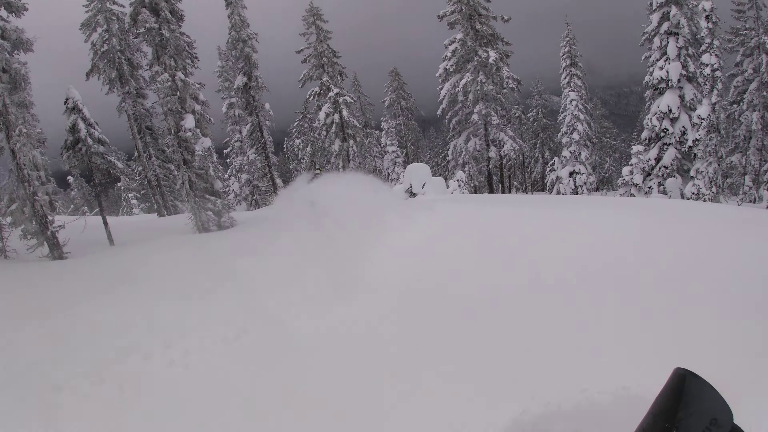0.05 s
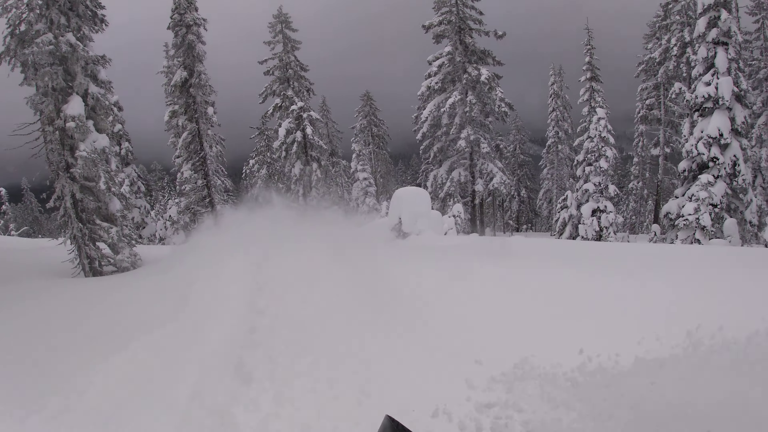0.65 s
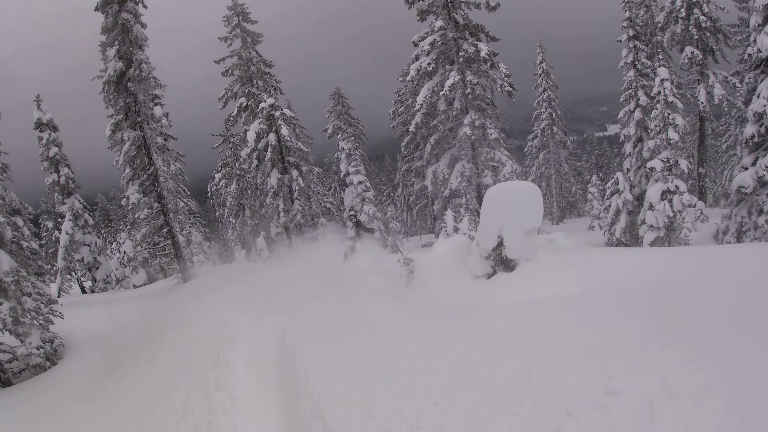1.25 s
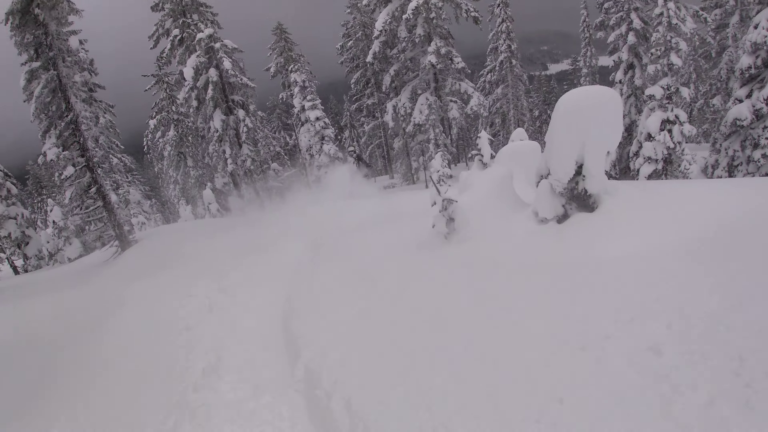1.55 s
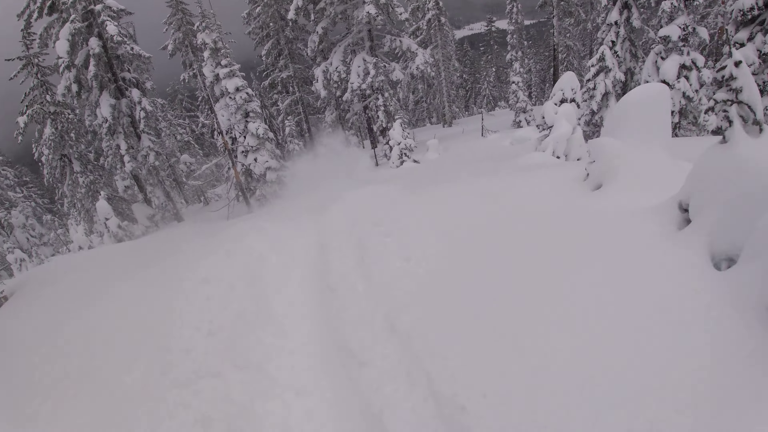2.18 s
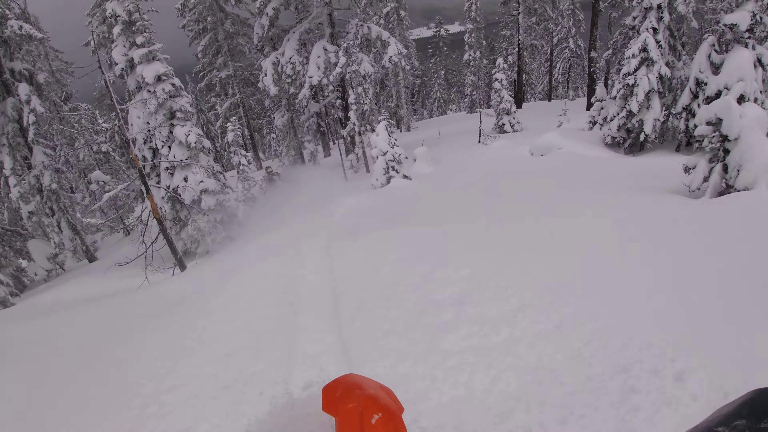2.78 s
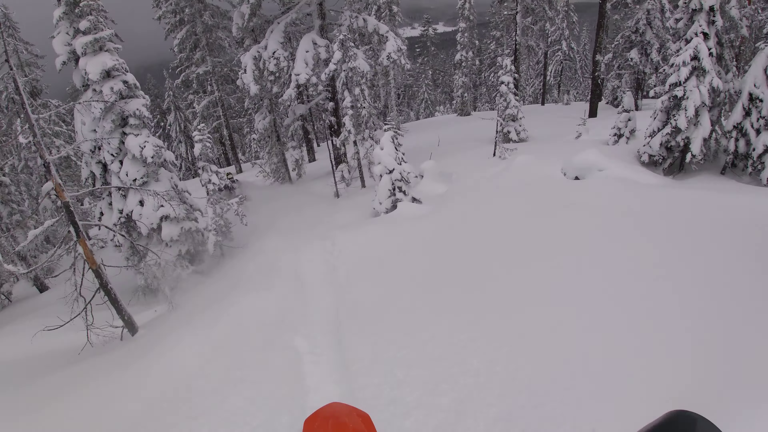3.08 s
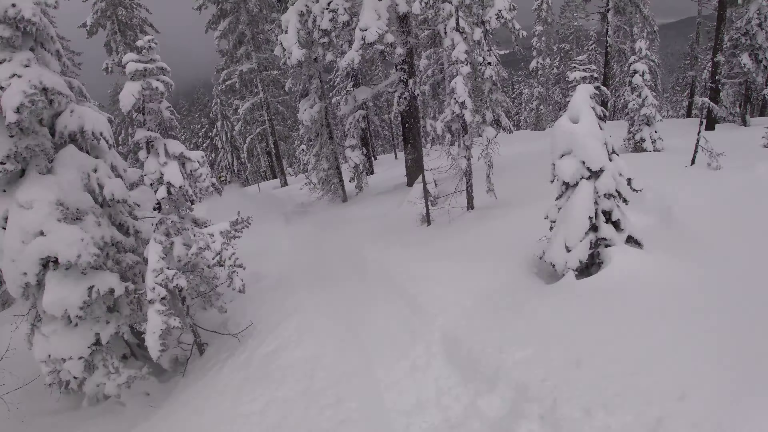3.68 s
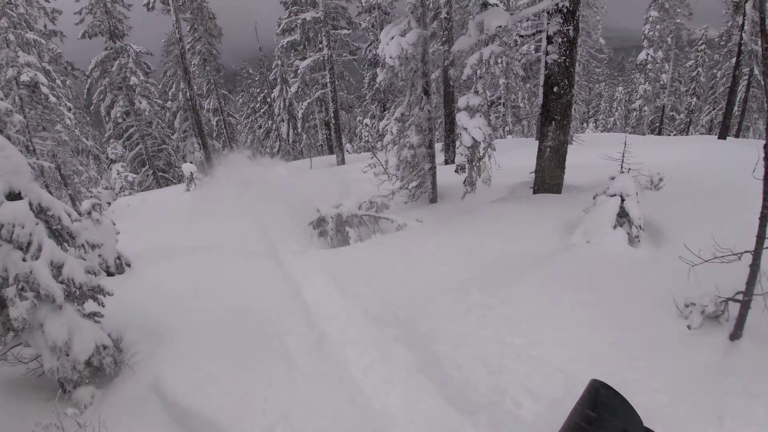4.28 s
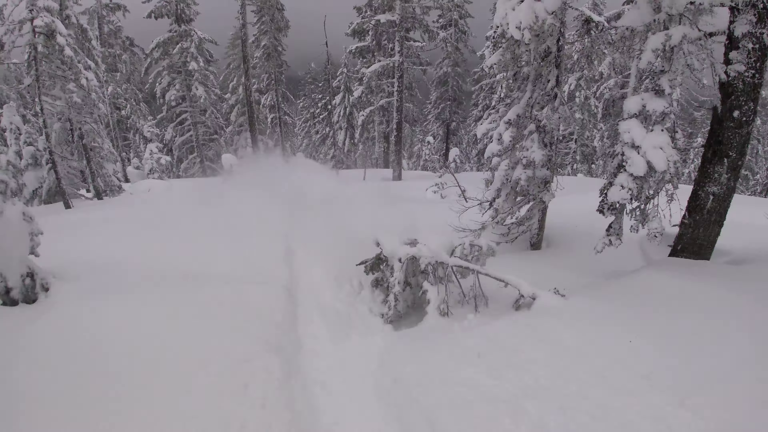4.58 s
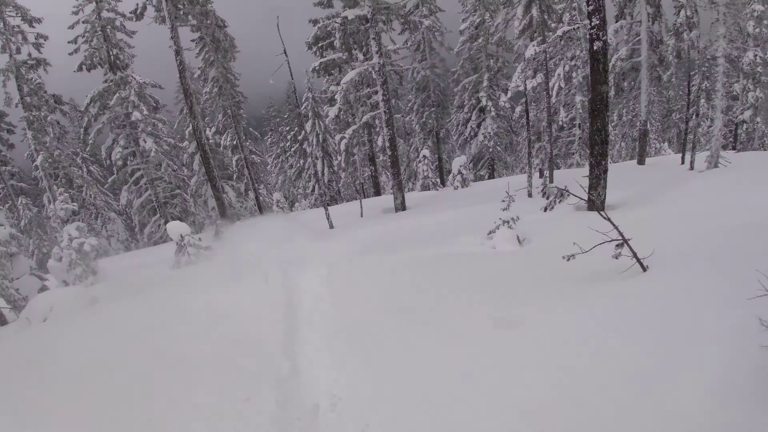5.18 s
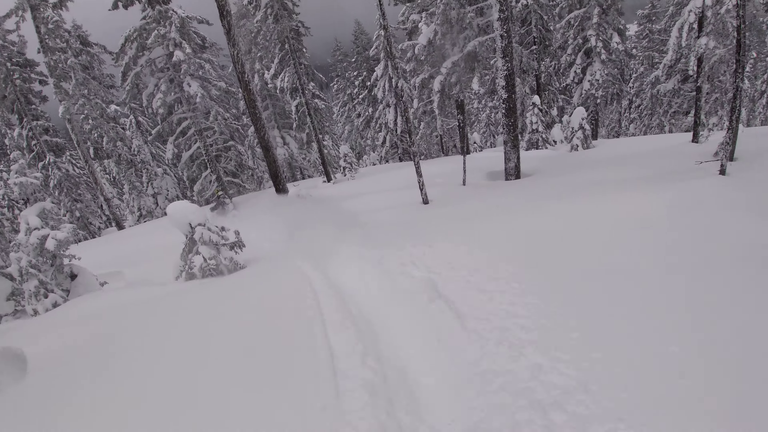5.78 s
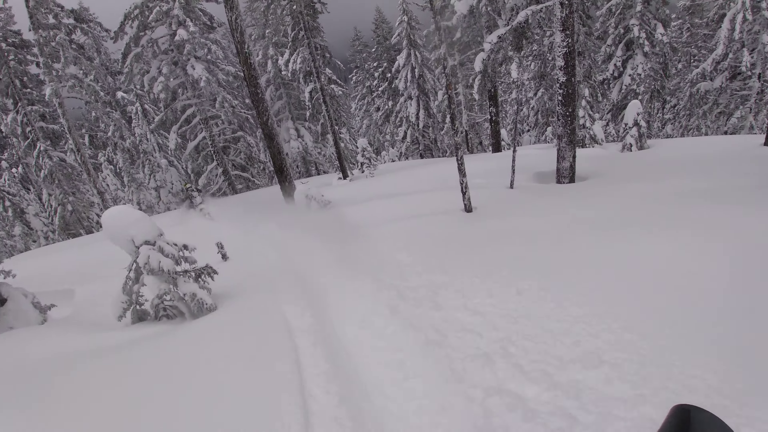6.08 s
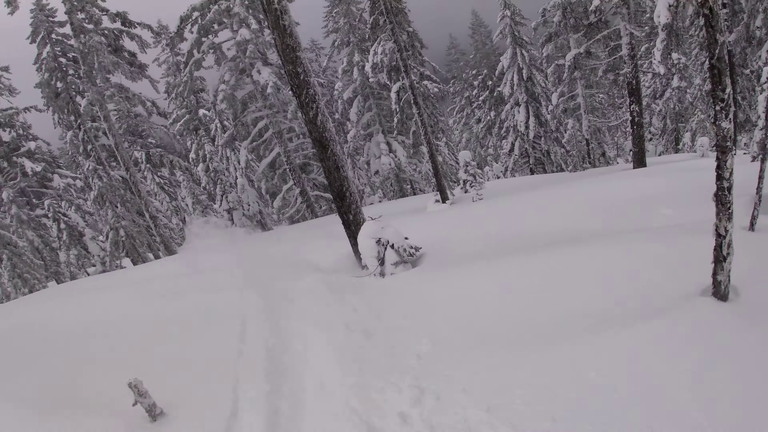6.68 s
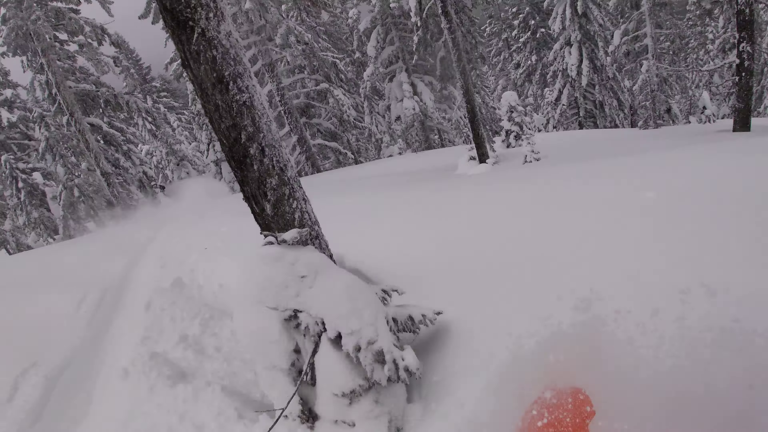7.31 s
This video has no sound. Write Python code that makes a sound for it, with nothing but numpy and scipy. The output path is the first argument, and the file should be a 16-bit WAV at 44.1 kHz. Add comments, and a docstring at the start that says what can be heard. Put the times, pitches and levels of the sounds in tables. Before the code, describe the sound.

A snowmobile engine runs for about seven and a half seconds, heard close from the rider's seat in deep snow: a dull, ringing, rapid thudding. It starts fast, slows towards 2 seconds, then rises and falls in short pushes of throttle between 3 and 5.5 seconds, with another at 6.3. A faster, sharp crackle, like a second machine revving, cuts in from 0.9 to 1.9 seconds, climbing in speed, again from 2.7 to 3, and from 5.4 to 6.3. It then drops to a soft putter while the main engine eases, leaving a stumbling rumble. A short, low hoot falls at about 1 second, and a thin squeal slips down at 4.8. Wind buffets the microphone throughout. Lower in level, the track churns snow, with faint spray hiss and soft swishes. The skis give brief crunches around 6.7 and 7.4 seconds.

```python
"""A dull, ringing thud from a snowmobile's muffler, one per firing, rises and falls with the throttle.
The microphone is at the rider's seat, out in deep powder, with wind buffeting it throughout.
Three times a faster, sharp crackle cuts in, like a second machine revving and then ticking over.
Just below, the track churns snow, spray hisses and the skis crunch; a hoot and a squeal slide by."""
import sys
import numpy as np
from scipy import signal
from scipy.fft import rfft, irfft
from scipy.io import wavfile
from scipy.ndimage import uniform_filter1d, minimum_filter1d

SR = 44100
rng = np.random.default_rng(int(sys.argv[2]) if len(sys.argv) > 2 else 0)


def transcribe(signal):
    """Save signal, clipped to [-1, 1], as a 16-bit WAV file at the path in sys.argv[1]."""
    frames = np.atleast_2d(signal).T
    limited = np.clip(frames, -1, 1)
    pcm = np.round(limited * 32767).astype(np.int16)
    wavfile.write(sys.argv[1], SR, pcm)


N = 328545
TIME = np.arange(N) / SR

# engine speed: t/s, firing rate/Hz
ENGINE_SPEED = [(0.0, 38.97), (0.27, 37.72), (0.52, 39.18), (0.7, 38.2), (1.24, 30.23), (1.42, 26.55),
                (1.58, 28.62), (1.8, 28.0), (1.98, 23.83), (2.08, 26.19), (2.65, 27.3), (2.93, 30.75),
                (3.11, 27.43), (3.39, 31.44), (3.53, 35.47), (4.13, 27.98), (4.25, 33.92), (4.45, 30.89),
                (4.65, 38.52), (4.75, 34.74), (5.19, 34.09), (5.33, 36.25), (5.41, 31.08), (6.15, 25.63),
                (6.29, 30.84), (6.63, 29.03), (6.83, 26.01), (7.45, 25.78)]
# throttle, as the strength of the muffler's ring: t/s, level/dB
THROTTLE = [(0, -18), (.81, -18.5), (1.43, -24), (1.55, -22.5), (1.82, -19.5), (1.95, -26.5), (2.04, -19.5),
            (2.62, -20), (2.86, -18.5), (3.14, -20.5), (3.28, -16), (3.39, -24), (3.49, -17), (3.63, -19),
            (3.74, -26.5), (4.05, -22), (4.28, -15), (4.4, -21), (4.66, -15.5), (4.74, -22.5), (4.86, -13),
            (5.18, -20.5), (5.35, -15.5), (5.47, -22), (6.2, -26), (6.32, -13), (6.43, -22.5),
            (6.67, -21.5), (6.77, -34.5), (7.17, -27), (7.45, -36.5)]
# the muffler's ring at cruise, its bark and the bark's top overtone: f/Hz, width/Hz, gain/dB
MUFFLER_MODES = [(259.3, 87, 0.28), (399.7, 110, -2.5), (1100, 890, -38.5)]
# the muffler's balance at cruising throttle: t/s, boom/dB, body/dB, bark/dB
MUFFLER_TONE = [(0, -15.5, -17, -24), (.9, -17, -16.5, -21.5), (1.3, -19, -19.5, -30),
                (1.65, -13, -18, -29.5), (1.92, -16.5, -17.5, -36), (2.07, -21, -18.5, -24.5),
                (2.24, -15, -18.5, -23.5), (2.55, -17, -18.5, -41), (2.8, -15, -19.5, -31),
                (2.87, -15, -18.5, -18.5), (3.05, -20.5, -22, -16), (3.15, -17.5, -21, -27),
                (3.3, -20.5, -20, -24), (3.55, -21.5, -18.5, -23.5), (3.95, -15, -20, -47.5),
                (4.35, -28, -17, -30.5), (4.65, -20.5, -16, -34), (4.9, -16.5, -25, -36.5),
                (5.18, -26, -16, -30), (5.45, -25, -18.5, -35.5), (6.2, -14, -21, -46.5),
                (6.65, -23.5, -17, -41), (7.45, -17.5, -17, -38.5)]
# centre of its deep boom: t/s, f/Hz
BOOM_PITCH = [(0, 69.4), (.9, 65.4), (1.6, 55.3), (2.5, 54.9), (3.3, 59.8), (4.1, 59.6), (5.0, 66),
              (5.7, 66), (6.3, 70.4), (6.9, 62), (7.45, 61.5)]
# the bark's nasal first overtone: t/s, f/Hz, level against the bark/dB
NASAL_OVERTONE = [(0, 742, -17.5), (1.0, 730, -17.5), (2.1, 825, -16), (2.5, 836, -22), (2.85, 650, -19.5),
                  (3.3, 660, -25.5), (4.2, 700, -19.5), (4.9, 720, -12)]
# spectrum of turbulent exhaust gas: f/Hz, level/dB
GAS_COLOUR = [(50, -10), (100, -12), (270, 4.5), (400, -4.5), (550, -16.5), (900, -39)]
# snap at the front of each thud: t/s, level/dB
SNAP_LEVEL = [(0, -50.5), (.8, -50), (1.2, -63), (1.95, -53), (2.1, -41), (2.25, -43.5), (2.5, -72),
              (2.85, -34), (3.04, -38), (3.12, -58), (3.25, -39.5), (3.8, -66.5), (4.27, -50), (4.4, -64),
              (4.7, -47), (4.8, -60), (4.9, -39), (5.04, -41.5), (5.2, -57), (5.33, -40), (5.5, -62),
              (7.45, -67)]
# its resonances: f/Hz, width/Hz, gain/dB
SNAP_MODES = [(893, 330, -5.5), (1250, 310, -12), (2100, 1500, -26)]
# spectrum of the intake's rasp: f/Hz, level/dB
INTAKE_COLOUR = [(900, -9), (1400, -6.5), (2100, 8), (2900, -1.5), (3700, -0.5), (4500, -6.5), (5600, -13),
                 (6500, -17.5), (7500, -30.5), (11000, -49.5)]

# the second machine's speed in each of its three bursts: t/s, stroke rate/Hz
BURST_SPEED_A = [(0.8523, 38.52), (1.03, 38.51), (1.2, 42.9), (1.4, 38.8), (1.5, 44.52), (1.62, 53.48),
                 (1.786, 61.0), (1.87, 60.0)]
BURST_SPEED_B = [(2.6525, 42.2), (2.75, 46.8), (2.8, 48.0), (2.85, 50.8), (3.036, 50.4)]
BURST_SPEED_C = [(5.3944, 49.35), (5.55, 49.12), (5.7, 47.73), (5.85, 50.97), (6.0, 49.19), (6.15, 48.08),
                 (6.258, 49.56), (6.36, 47.0)]
# its pipe, one curve per burst: t/s, ring f/Hz, thump/dB, ring/dB, middle/dB, high/dB
PIPE_CURVES = [
    [(.85, 1500, -59, -72, -62, -57), (.93, 1490, -56, -56, -45, -53.5),
     (1.06, 1480, -48.5, -50, -32, -45.5), (1.11, 1460, -55.5, -42, -39, -52),
     (1.135, 1440, -57, -42, -27.5, -54.5), (1.19, 1440, -53, -40.5, -25.5, -47),
     (1.26, 1460, -43, -37.5, -24, -47), (1.36, 1410, -56, -34.5, -33, -55),
     (1.43, 1370, -37.5, -37.5, -27.5, -44.5), (1.56, 1400, -30.5, -33, -27, -51),
     (1.68, 1280, -34.5, -29.5, -29, -43.5), (1.77, 1260, -35, -31, -29.5, -52.5),
     (1.87, 1240, -50, -56, -52, -65)],
    [(2.65, 1390, -43, -43, -45, -65), (2.72, 1300, -34.5, -36, -48, -62),
     (2.76, 1300, -36.5, -41, -48, -61), (2.82, 1290, -29.5, -34, -44, -49),
     (2.88, 1230, -47, -42.5, -50, -55), (3.03, 1210, -48, -41, -57, -53)],
    [(5.4, 1400, -38, -48, -76, -70), (5.58, 1470, -32, -37, -59, -64), (5.7, 1430, -33.5, -40, -45, -56),
     (5.79, 1450, -38.5, -32.5, -41.5, -40.5), (5.92, 1350, -34.5, -35, -42.5, -47),
     (5.99, 1340, -39, -36, -35.5, -54), (6.16, 1320, -34, -36.5, -44, -41),
     (6.23, 1190, -35.5, -36.5, -39, -52.5), (6.28, 1200, -42.5, -50.5, -45, -58),
     (6.35, 1200, -55, -59, -61.5, -58)],
]
# one row per burst: echo off the snow/dB, low knock/dB, top sizzle/dB
BURST_TRIMS = [(-21, 1, -3), (-21.5, -0.5, 1), (-12.5, -2, 2.5)]
# the pipe's two thumps: f/Hz, width/Hz, gain/dB
THUMP_MODES = [(405, 220, -3), (538, 260, -3)]
# resonances of its cracks, two low, one middle, two high: f/Hz, width/Hz, gain/dB
CRACK_MODES = [(760, 530, -7), (1460, 810, -4.5), (2274, 1050, -8.5), (3400, 1640, 2), (5320, 1200, -6)]
# the second machine ticking over: t/s, stroke rate/Hz
IDLE_SPEED = [(6.0, 46), (6.36, 49.5), (6.8, 48), (7.45, 48.5)]
# strength of that putter: t/s, level/dB
PUTTER_LEVEL = [(6.0, -35), (6.22, -28), (6.45, -31), (6.7, -28), (7.0, -29.5), (7.45, -24.5)]
# its resonances: f/Hz, width/Hz, gain/dB
PUTTER_MODES = [(54.7, 53, -1.5), (104, 44, -2), (150, 70, -6.5)]

# a low hoot, falling while the engine slows: t/s, f/Hz, level/dB
HOOT_GLIDE = [(.88, 468, -47.5), (.95, 434, -27), (1.0, 430, -23.5), (1.05, 388, -23.5), (1.1, 362, -16),
              (1.18, 330, -49)]
# a brief, thin squeal, perhaps the drive belt: t/s, f/Hz, level/dB
SQUEAL_GLIDE = [(4.745, 960, -74), (4.768, 923, -33), (4.79, 840, -46), (4.81, 844, -35),
                (4.835, 796, -40.5), (4.86, 800, -72)]

# drag of the snow on the track, as the strength of its churning: t/s, relative level/dB
SNOW_DRAG = [(0, -49.5), (.8, -40), (1.15, -46), (1.65, -39.5), (1.95, -47), (2.4, -43.5), (2.75, -40.5),
             (3.2, -48.5), (3.55, -39), (4.0, -50), (4.38, -43), (4.48, -36.5), (4.62, -44.5),
             (4.75, -42.5), (5.0, -46.5), (5.5, -40.5), (6.2, -41.5), (6.9, -51), (7.45, -51.5)]
# spectra of churned snow and of spray: f/Hz, level/dB
CHURN_COLOUR = [(250, -7.5), (420, 13.5), (600, 8.5), (900, -1.5), (1400, -7.5), (2000, -17.5),
                (3000, -32.5), (5000, -50.5)]
SPRAY_COLOUR = [(900, -21), (1400, 2.5), (1700, 3), (2000, 5), (2400, -0.5), (2900, -1), (3400, 2.5),
                (3900, -6.5), (4400, -8.5), (5400, -2.5), (6200, -17), (7200, -30.5), (9000, -29.5),
                (12000, -56.5)]
# skis shoving into packed snow: t/s, length/s, relative level/dB
SKI_SHOVES = [(6.648, 0.028, -26), (6.681, 0.019, -28.5), (6.753, 0.036, -30.5), (7.359, 0.036, -33.5),
              (7.419, 0.054, -32.5)]
# spectrum of a shove: f/Hz, level/dB
CRUNCH_COLOUR = [(200, 9), (450, 11), (1000, 0), (1700, -10.5), (2600, -23.5), (5000, -44)]
# snow brushing past the seat: t/s, half-length/s, f/Hz, half-width/octaves, level/dB
SNOW_BRUSHES = [(0.272, 0.3, 3270, 0.52, -57.5), (1.791, 0.11, 2020, 0.88, -42),
                (1.93, .09, 12000, .6, -72), (2.851, 0.039, 1030, 2, -40.5),
                (3.643, 0.21, 1365, 1.4, -47.5), (3.744, 0.064, 2700, 0.66, -54),
                (4.475, 0.054, 1000, 1.7, -43), (4.477, 0.034, 3960, 1.1, -59.5),
                (4.479, 0.041, 8600, .6, -78), (4.547, .05, 1480, 1.1, -50),
                (4.527, 0.062, 3000, .4, -50.5), (4.683, 0.028, 900, 1.4, -41),
                (5.24, .06, 8600, .6, -73.5), (6.532, 0.12, 3300, 0.83, -53.5)]
# crumbs of snow hitting the microphone: t/s, relative level/dB
CRUMB_HITS = [(2.5805, -52), (3.5279, -61), (4.4408, -55), (4.781, -55), (4.9776, -55), (5.2494, -56),
              (6.7106, -57), (7.145, -57)]
# spectrum of a crumb's tick: f/Hz, level/dB
TICK_COLOUR = [(4000, -7), (8500, 4), (11000, -9), (14000, -19)]
# wind on the microphone: t/s, level/dB
WIND_LEVEL = [(0, -18), (1.2, -24), (1.6, -24), (2.5, -25.5), (3.4, -19.5), (4.3, -22), (5.2, -22.5),
              (5.8, -21.5), (6.6, -21.5), (7.45, -24)]
# its spectrum: f/Hz, level/dB
WIND_COLOUR = [(15, -7), (27, -1.5), (50, -1), (100, -8.5), (200, -7.5), (400, -28)]

CRUISE_DB, CRUISE_PER_S, USUAL_DRAG_DB = -18.5, 25.8, -44.5   # reference throttle, firing rate and drag


def engine():
    """Close to the seat, each firing rings the muffler; a steady rush of gas grows as the snow drags."""
    times, _ = firings(ENGINE_SPEED)
    per_s, = read(ENGINE_SPEED, times)
    boom, body, ring, bark, body_hz = muffler(times)
    boom_hz, = read(BOOM_PITCH, times)
    nasal_hz, nasal_db = read(NASAL_OVERTONE, times)
    (ring_hz, ring_width_hz, ring_db), *barks = MUFFLER_MODES
    revs = per_s / CRUISE_PER_S
    modes = [(boom_hz, 39, -5), (body_hz, 125.6, 0),   # f/Hz, width/Hz, gain/dB
             (ring_hz * revs ** .16, ring_width_hz * revs[:, None] ** .75, ring_db),
             (172, 60, -10.5),   # hollow lower ring
             (nasal_hz, 280, nasal_db)] + barks
    uneven_db = .77 * 2 ** ((CRUISE_DB - ring) / 8)   # thuds turn uneven as the throttle eases
    spectra = resonances(modes, [boom, body, ring, ring, bark, bark, bark], per_s, uneven_db, wander=.009)
    thuds = place(times + rng.normal(0, .00005, len(times)), -causal(spectra))
    strain_db = read(SNOW_DRAG, TIME)[0] - USUAL_DRAG_DB
    extra_per_s = read(ENGINE_SPEED, TIME)[0] - CRUISE_PER_S
    gas_db = -27 + .84 * strain_db - .3 * extra_per_s   # it burns cleaner at speed
    return lag_lows(thuds, corner_hz=120) + from_db(gas_db) * noise(GAS_COLOUR)


def muffler(when):
    """Throttle sets the boom, body, ring and bark levels (dB) and, with speed, the body's pitch (Hz)."""
    ring, = read(THROTTLE, when)
    per_s, = read(ENGINE_SPEED, when)
    boom, body, bark = read(MUFFLER_TONE, when)
    push_db = ring - CRUISE_DB
    body_hz = 154 * (per_s / CRUISE_PER_S) ** .83 * 2 ** (.1273 * push_db)
    return boom - .038 * push_db, body + .095 * push_db, ring, bark + 1.7 * push_db, body_hz


def snap(lead_s=.001):
    """Under load each thud begins with a crisp snap."""
    times, _ = firings(ENGINE_SPEED)
    per_s, = read(ENGINE_SPEED, times)
    db, = read(SNAP_LEVEL, times)
    spectra = resonances(SNAP_MODES, [db] * len(SNAP_MODES), per_s, rough_db=1.2, wander=.02)
    return place(times - lead_s, causal(spectra))


def intake(max_loss_db=18):
    """A rasping gulp of air just before each firing, strongest when the engine barks at low speed."""
    _, turns = firings(ENGINE_SPEED)
    _, _, _, bark_db, _ = muffler(TIME)
    extra_per_s = read(ENGINE_SPEED, TIME)[0] - CRUISE_PER_S
    db = bark_db - 18.5 - np.minimum(4 * extra_per_s, max_loss_db)
    return from_db(db) * noise(INTAKE_COLOUR) * once_a_turn(turns, at=.82, sharpness=7.6)


def crackle(speed, pipe_curve, trims, bounce_s=.0102):
    """Each stroke of the second machine cracks sharply; its pipe's thump and ring echo off the snow."""
    times, _ = firings(speed)
    per_s, = read(speed, times)
    ring_hz, thump, ring, middle, high = read(pipe_curve, times)
    bounce_db, knock_db, sizzle_db = trims
    tone_modes = THUMP_MODES + [(ring_hz, 424, -1.5)]
    tone_levels = [thump + 2.5, thump + 2.5, ring]
    tones = causal(resonances(tone_modes, tone_levels, per_s, rough_db=1.8, wander=.03))
    bounce = from_db(bounce_db) * place(times + bounce_s, tones)
    crack_levels = [thump + knock_db, ring, middle, high, high + sizzle_db]
    colour = ripple(len(times))
    cracks = causal(colour * resonances(CRACK_MODES, crack_levels, per_s, rough_db=1.6, wander=.045))
    return place(times, tones) + bounce + place(times, scatter(cracks))


def ripple(count, spacing_hz=380, depth_db=5.5, size=4096):
    """Broad peaks and dips colour each crack's spectrum, shifting within a few strokes."""
    grid = np.fft.rfftfreq(size, 1 / SR) / spacing_hz
    knots = uniform_filter1d(rng.standard_normal((count, 200)), size=2, axis=0)
    curves = rms_one(np.array([np.interp(grid, np.arange(len(row)), row) for row in knots]))
    return rms_one(from_db(depth_db * np.tanh(curves)))


def scatter(cracks, decay_s=.002, scatter_db=-7.5):
    """Close reflections trail each crack."""
    age = np.arange(cracks.shape[1]) / SR
    echoes = rng.standard_normal(cracks.shape) * np.exp(-age / decay_s)
    echoes = uniform_filter1d(echoes, size=3, axis=0)   # neighbouring cracks share some echoes
    echoes *= from_db(scatter_db) / np.linalg.norm(echoes, axis=1, keepdims=True)
    echoes[:, 0] = 1   # the direct crack
    echoes /= np.linalg.norm(echoes, axis=1, keepdims=True)
    return signal.fftconvolve(cracks, echoes, axes=1)


def putter():
    """The second machine's soft, uneven idle beats against the engine, so that the rumble stumbles."""
    times, _ = firings(IDLE_SPEED)
    per_s, = read(IDLE_SPEED, times)
    db, = read(PUTTER_LEVEL, times)
    spectra = resonances(PUTTER_MODES, [db] * len(PUTTER_MODES), per_s, rough_db=3.5, wander=.04)
    return place(times, causal(spectra))


def sliding_tone(glide):
    """A pure tone swells and fades as it slides down: the hoot or the squeal."""
    hz, db = read(glide, TIME)
    sounding = (TIME > glide[0][0]) & (TIME < glide[-1][0])
    return sounding * from_db(db) * np.sin(2 * np.pi * np.cumsum(hz) / SR)


def track():
    """Under the seat the track churns snow and throws hissing spray; both swell a little each turn."""
    _, turns = firings(ENGINE_SPEED)
    drag_db, = read(SNOW_DRAG, TIME)
    hiss_db = -49.5 + .38 * (drag_db - USUAL_DRAG_DB)
    churn = from_db(drag_db + 5.5 + 1.5 * drift(40)) * noise(CHURN_COLOUR)
    churn *= once_a_turn(turns, at=.014, sharpness=.27)
    spray = from_db(hiss_db + drift(60)) * noise(SPRAY_COLOUR)
    spray *= once_a_turn(turns, at=.89, sharpness=.22)
    return churn + spray


def skis():
    """Ahead of the seat, packed snow gives way under the skis in short, grainy crunches."""
    push = sum(from_db(db) * np.exp(-2 * ((TIME - s) / length) ** 2) for s, length, db in SKI_SHOVES)
    return push * noise(CRUNCH_COLOUR) * from_db(3 + 2.7 * drift(120))


def brushes():
    """Snow brushes past in soft, grainy swishes, from broad gushes to narrow scrapes."""
    out = 0
    for s, half_length, hz, octaves, db in SNOW_BRUSHES:
        swell = from_db(db + 4.1 * drift(150)) * np.exp(-((TIME - s) / half_length) ** 2)
        out = out + swell * noise([(hz / 2 ** octaves, -26), (hz, 0), (hz * 2 ** octaves, -30)])
    return out


def crumbs(decay_s=.003, gain_db=-3.5):
    """Crumbs of snow land right on the microphone: tiny, bright ticks that die at once."""
    ticks = sum(from_db(db + gain_db) * (TIME >= s) * np.exp(-np.abs(TIME - s) / decay_s)
                for s, db in CRUMB_HITS)
    return ticks * noise(TICK_COLOUR)


def wind():
    """Low, lumpy buffeting on the microphone, underneath everything."""
    db, = read(WIND_LEVEL, TIME)
    return from_db(db + drift(3.1)) * noise(WIND_COLOUR)


def firings(speed):
    """Times at which the crank completes a turn, and the count of turns at every sample."""
    s, per_s = np.transpose(speed)
    when = np.arange(s[0], s[-1], 1 / SR)
    turns = np.cumsum(np.interp(when, s, per_s)) / SR
    return np.interp(np.arange(turns[-1]), turns, when), np.interp(TIME, when, turns)


def once_a_turn(turns, at, sharpness):
    """A smooth swell of unit power at one crank angle, given in turns."""
    return rms_one(np.exp(sharpness * np.cos(2 * np.pi * (turns - at))))


def resonances(modes, levels_db, per_s, rough_db, wander, size=4096):
    """One magnitude spectrum per pulse: steep resonances that stray in level and, by wander, in pitch."""
    grid = np.maximum(np.fft.rfftfreq(size, 1 / SR), 1)
    power = 0
    for (hz, width_hz, db), level_db in zip(modes, levels_db):
        level_chance, pitch_chance = rng.standard_normal((len(per_s), 2)).T
        centre = (hz * np.exp(wander * pitch_chance))[:, None]
        shape = (1 + ((grid - centre ** 2 / grid) / width_hz) ** 2) ** -3
        energy = from_db(level_db + db + rough_db * level_chance) ** 2 * SR / per_s
        power = power + shape * (energy / shape.mean(axis=1))[:, None]
    return np.sqrt(power)


def causal(magnitudes):
    """Pulses with these spectra that start at once and then ring out (minimum phase)."""
    cepstrum = irfft(np.log(magnitudes + 1e-5 * magnitudes.max()))
    half = cepstrum.shape[1] // 2
    cepstrum[:, 1:half] *= 2
    cepstrum[:, half + 1:] = 0
    return irfft(np.exp(rfft(cepstrum)))


def place(times, pulses):
    """Lay each pulse down at its time."""
    out = np.zeros(N + SR)
    starts = (np.clip(times, 0, N / SR) * SR).astype(int)
    for at, pulse in zip(starts, pulses):
        out[at:at + len(pulse)] += pulse
    return out[:N]


def lag_lows(x, corner_hz):
    """An all-pass: the lows leave the muffler a little after the highs."""
    pole = np.exp(-2 * np.pi * corner_hz / SR)
    return signal.lfilter([pole, -1], [1, -pole], x)


def noise(colour):
    """Noise of unit power with the given spectrum, falling away beyond its ends."""
    hz, db = np.transpose(colour)
    grid = np.maximum(np.fft.rfftfreq(N, 1 / SR), 1)
    gain = from_db(np.interp(np.log(grid), np.log(hz), db))
    skirts = np.minimum(grid / hz[0], 1) ** 2 * np.minimum(hz[-1] / grid, 1) ** 2
    return rms_one(irfft(rfft(rng.standard_normal(N)) * gain * skirts, N))


def drift(per_s):
    """A random curve with a spread near 1, passing per_s knots a second and holding the last."""
    knots = rng.standard_normal(1000)
    return np.interp(TIME * per_s, np.arange(len(knots)), knots)


def read(rows, when):
    """Every column of a curve at the given times."""
    s, *columns = np.transpose(rows)
    return [np.interp(when, s, column) for column in columns]


def from_db(db):
    """Decibels to gain."""
    return 10 ** (np.asarray(db) / 20)


def rms_one(x):
    """Scale to unit power."""
    return x / np.sqrt(np.mean(x ** 2) + 1e-20)


def scene():
    """Both machines, snow and wind meet at one microphone at the rider's seat."""
    speeds = [BURST_SPEED_A, BURST_SPEED_B, BURST_SPEED_C]
    bursts = sum(crackle(*burst) for burst in zip(speeds, PIPE_CURVES, BURST_TRIMS))
    machines = engine() + snap() + intake() + bursts + putter()
    glides = sliding_tone(HOOT_GLIDE) + sliding_tone(SQUEAL_GLIDE)
    return (machines + glides + track() + skis() + brushes() + crumbs() + wind())[None]


def record(dry):
    """Behind the microphone a limiter holds the strongest thuds at one height; the top is cut."""
    ceiling_db, cutoff_hz = -.6, 11500
    allowed = np.minimum(1, from_db(ceiling_db) / (np.abs(dry) + 1e-9))
    gain = uniform_filter1d(minimum_filter1d(allowed, size=900), size=900)
    return signal.sosfilt(signal.butter(10, cutoff_hz, fs=SR, output="sos"), dry * gain)


dry = scene()
out = record(dry)
transcribe(out)
```